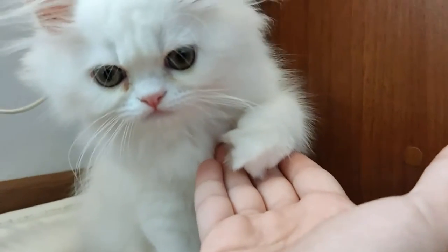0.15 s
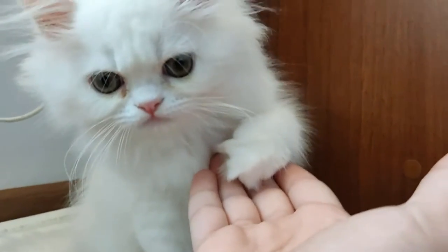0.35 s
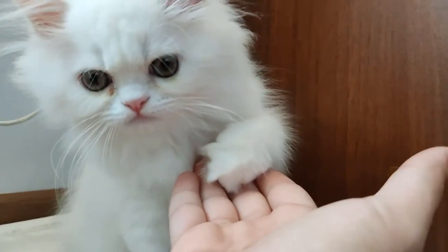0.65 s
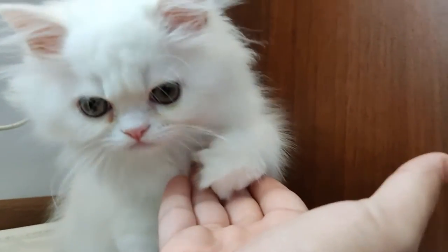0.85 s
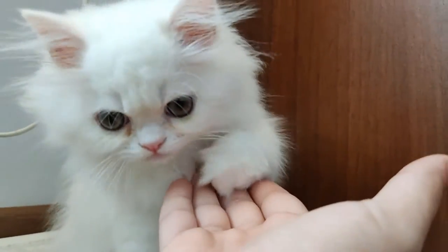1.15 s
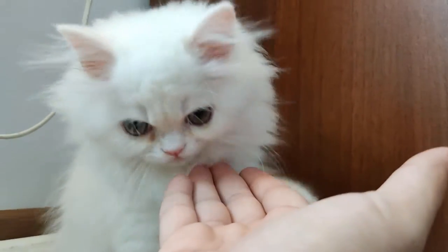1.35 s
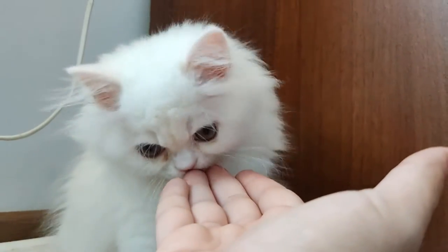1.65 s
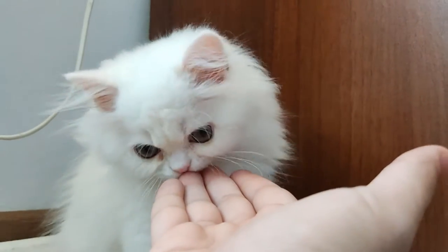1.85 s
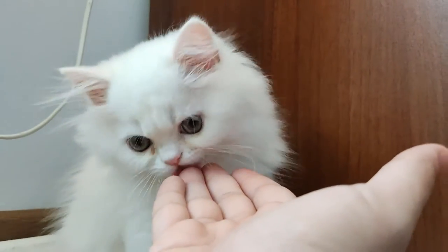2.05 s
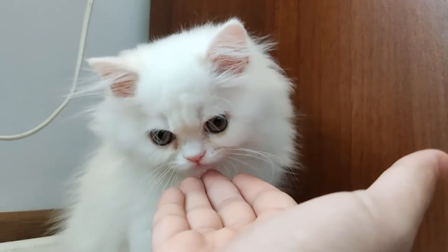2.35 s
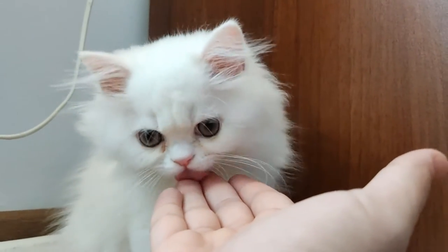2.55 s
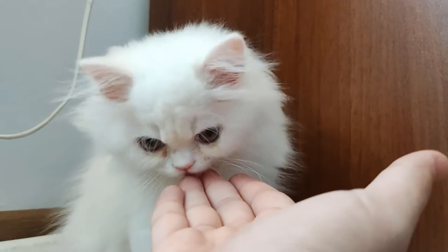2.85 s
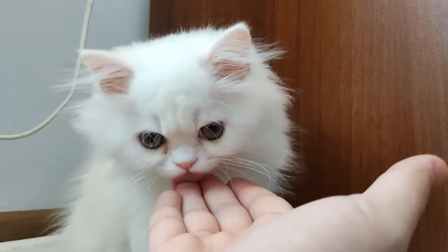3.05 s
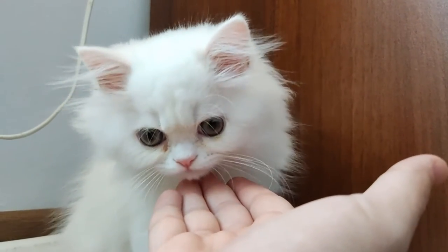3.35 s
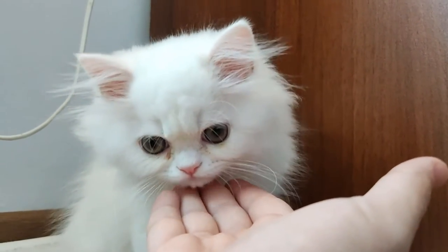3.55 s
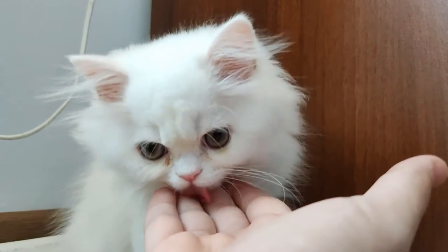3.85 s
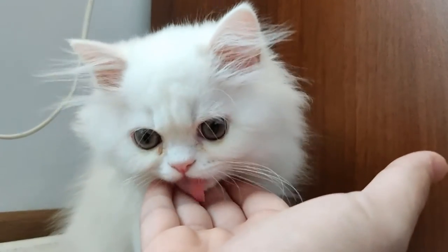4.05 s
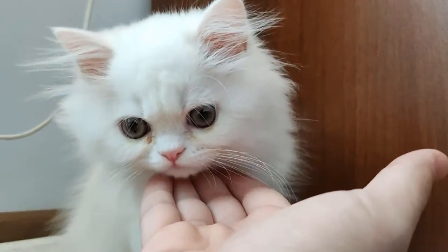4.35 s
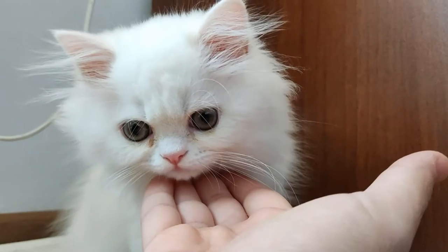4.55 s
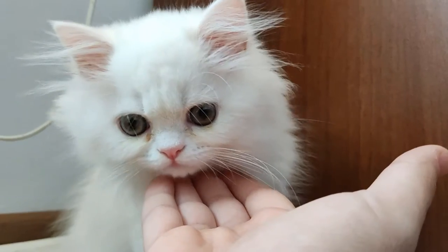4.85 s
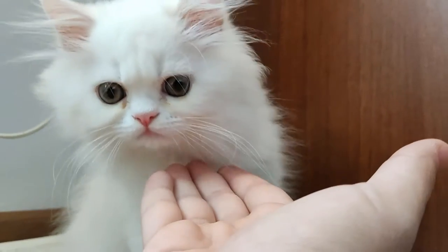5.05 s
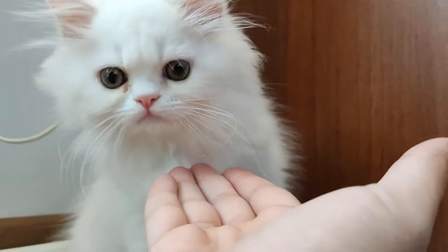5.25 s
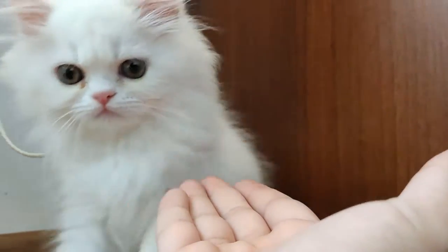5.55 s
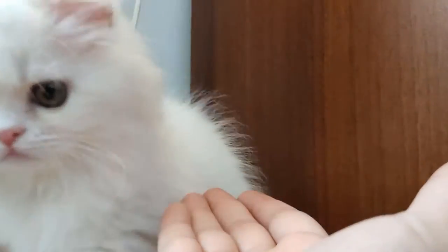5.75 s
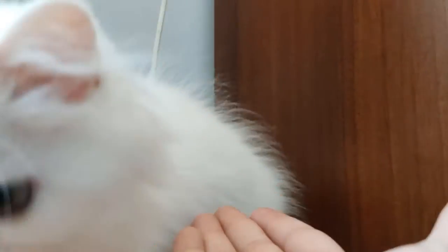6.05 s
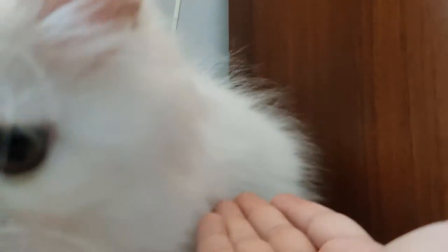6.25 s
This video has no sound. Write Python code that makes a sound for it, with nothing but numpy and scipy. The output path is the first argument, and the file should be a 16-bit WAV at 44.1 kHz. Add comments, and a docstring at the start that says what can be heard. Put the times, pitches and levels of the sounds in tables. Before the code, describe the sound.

Close, dry indoor sound on a hand-held phone with low rumble and faint hiss. First come rapid crackly finger taps, slips and dull thumps on the left side. Then the handling calms, leaving a kitten's delicate licking, sandpapery tongue strokes, little nose puffs and crisp wet clicks leaning right. Near the end, hollow knocks and clicks return, fading to light ticks and soft fur brushing.

```python
"""Grip rumble and a burst of finger taps and slips open the scene, loud on the left; then a kitten licks and sniffs.
Fingers: impulses and stick-slip grains reach the left port through the phone case, treble first.
Kitten: grainy rasp, wet smacks and fizz reach two ports through air; the right port boosts 7 to 8 kHz.
Short pitched ticks ring in the air; each port adds its own unrelated hiss and rumble."""
import sys
import numpy as np
from scipy import signal
from scipy.fft import rfft, irfft, next_fast_len
from scipy.io import wavfile
from scipy.ndimage import uniform_filter1d

SR = 44100
rng = np.random.default_rng(int(sys.argv[2]) if len(sys.argv) > 2 else 0)


def int16_out(signal):
    """Quantize to a 16-bit WAV file."""
    q = np.round(np.clip(np.atleast_2d(signal).T, -1, 1) * 32767)
    wavfile.write(sys.argv[1], SR, q.astype(np.int16))


N = 282240
FFT_SIZE = next_fast_len(N + 8192)
HZ = np.maximum(np.arange(FFT_SIZE // 2 + 1) * SR / FFT_SIZE, 1)


def undb(db):
    """Decibels to gain."""
    return 10 ** (np.asarray(db) / 20)


def curve(table):
    """Columns of a table joined by straight lines in time."""
    s, *columns = np.transpose(table)
    return [np.interp(np.arange(N) / SR, s, column) for column in columns]


def response(points):
    """Causal minimum-phase response through (hz, level_db) points, by folding the cepstrum."""
    hz, level_db = np.transpose(points)
    gain = undb(np.interp(np.log(HZ), np.log(hz), level_db))
    cepstrum = irfft(np.log(gain), FFT_SIZE)
    cepstrum[1:FFT_SIZE // 2] *= 2
    cepstrum[FFT_SIZE // 2 + 1:] = 0
    return np.exp(rfft(cepstrum))


def through(x, spectrum):
    """Filter a sound by a response."""
    return irfft(rfft(x, FFT_SIZE) * spectrum, FFT_SIZE)[:N]


def unit(spectrum, peak):
    """Scale a response so that a click peaks at 1, or so that white noise keeps its level."""
    impulse = irfft(spectrum, FFT_SIZE)
    if peak:
        return spectrum / np.abs(signal.hilbert(impulse)).max()
    return spectrum / np.sqrt(np.sum(impulse ** 2))


def clicks(s, db):
    """One impulse for each time."""
    x = np.zeros(N)
    np.add.at(x, (np.asarray(s) * SR).astype(int), undb(db))
    return x


def splinter(s, db, rough_db, ms):
    """A clean impulse plus a short decaying noise tail of rough contact."""
    tail = signal.lfilter([1], [1, -np.exp(-1000 / (ms * SR))], clicks(s, db + rough_db))
    return clicks(s, db) + tail * rng.standard_normal(N)


def grains(per_s, spread_db, smooth):
    """Random slips of uneven but bounded size over smooth noise; smooth is the noise share of power; level 1."""
    hit = rng.random(N) < per_s / SR
    size = np.minimum(rng.exponential(size=N), 3)
    sign = rng.choice([-1, 1], N)
    noise = rng.standard_normal(N)
    slips = hit * sign * undb(spread_db * size)
    share = np.clip(smooth, 0, 1)
    return np.sqrt(1 - share) * slips / np.sqrt(np.mean(slips ** 2)) + np.sqrt(share) * noise


def strokes(start_s, length_s, level_db, rise_db_s, fall_db_s):
    """Gain that rises to each start, holds for its length and falls away; the loudest stroke wins."""
    gain = np.zeros(N)
    for s, hold_s, db in zip(start_s, length_s, level_db):
        a, b = max(int((s - .2) * SR), 0), min(int((s + hold_s + .2) * SR), N)
        t = np.arange(a, b) / SR - s
        rise = rise_db_s * np.minimum(t, 0)
        fall = fall_db_s * np.maximum(t - hold_s, 0)
        gain[a:b] = np.maximum(gain[a:b], undb(db + rise - fall))
    return gain


def walk(rate_hz):
    """Random levels held 1 / rate_hz and slewed twice; spread near 1."""
    k = int(SR / rate_hz)
    steps = np.repeat(rng.standard_normal(N // k + 1), k)
    return 1.42 * uniform_filter1d(uniform_filter1d(steps, k), k)[:N]


def ring(x, hz, t60_s):
    """One decaying mode, as a complex one-pole resonator."""
    pole = np.exp(2j * np.pi * hz / SR - np.log(1000) / (t60_s * SR))
    return signal.lfilter([1], [1, -pole], x).imag


# port noise spectrum: hz, level_db
NOISE_SPECTRUM = [(5, 4), (20, 7), (60, -7.5), (200, -14), (600, -22.5), (1500, -31.5), (4000, -39.5),
                  (6000, -41.5), (8500, -40), (10000, -49), (12500, -47), (13200, -83)]
# port noise level before port colour: left_db, right_db
NOISE_DB = (-38.5, -45.5)


def room_tone():
    """Unrelated hiss and rumble in each port, each wavering a little in level."""
    colour = unit(response(NOISE_SPECTRUM), False)
    return np.array([through(rng.standard_normal(N) * undb(db + 1.0 * walk(10.0)), colour)
                     for db in NOISE_DB])


# grip load on the case: time_s, shake_db, sway_db
GRIP_LOAD = [(0.0, -42.5, -26), (0.14, -39, -29.5), (0.3, -47.5, -34.5), (0.45, -35.5, -23),
             (0.65, -35, -20.5), (0.86, -36.5, -25), (1.07, -32.5, -26.5), (1.35, -41, -33),
             (1.71, -47, -36.5), (2.23, -42, -33.5), (2.51, -45, -34.5), (3.39, -46, -36),
             (3.74, -49.5, -43), (4.21, -45, -37), (4.79, -45, -45), (5.13, -46.5, -41), (5.72, -39.5, -34),
             (6.06, -47.5, -38), (6.26, -42.5, -32.5), (6.4, -44.5, -38)]
# shake spectrum: hz, level_db
SHAKE_SPECTRUM = [(30, -11), (70, 1), (130, -4), (200, -2.5), (400, -12.5), (800, -26.5), (2000, -36),
                  (8000, -105)]
# sway spectrum: hz, level_db
SWAY_SPECTRUM = [(5, 9), (20, 4), (40, 0), (80, -13), (200, -60), (2000, -100)]


def grip():
    """Muscle tremor shakes the case and shifting load sways it: two low noises sharing one flutter."""
    shake_db, sway_db = curve(GRIP_LOAD)
    tremor_db = 3.0 * walk(12)
    shake = rng.standard_normal(N) * undb(shake_db + tremor_db)
    shake = through(shake, unit(response(SHAKE_SPECTRUM), False))
    sway = rng.standard_normal(N) * undb(sway_db + tremor_db)
    return shake + through(sway, unit(response(SWAY_SPECTRUM), False))


LATE_S, LATE_HZ, CASE_HZ = 0.001013, 6955, 152.6


def case_delay():
    """Bending waves: delay = LATE_S * (sqrt(LATE_HZ / (hz + CASE_HZ)) - 1), so treble leads."""
    return np.exp(-2j * np.pi * LATE_S * (2 * np.sqrt(LATE_HZ * (HZ + CASE_HZ)) - HZ))


def case_path(points, peak):
    """Spectrum of a case sound with the bending-wave delay as its phase: a downward chirp."""
    return unit(np.abs(response(points)) * case_delay(), peak)


# finger slips on the case: start_s, length_s, scratch_db, drag_db
FINGER_SLIPS = [(0.223, 0.027, -40.5, -55), (0.263, 0.016, -38.5, -63), (0.344, 0.0085, -37.5, -60),
                (0.374, 0.0083, -41, -62), (0.448, 0.0088, -36.5, -43), (0.543, 0.022, -53, -60),
                (0.577, 0.0049, -34.5, -35), (0.679, 0.025, -47, -49), (0.818, 0.13, -53, -55),
                (0.921, .05, -38, -43.5), (0.976, 0.028, -29.5, -26.5), (1.08, 0.052, -48, -41),
                (1.159, 0.017, -46.5, -39), (1.264, 0.03, -44, -40.5), (1.373, 0.014, -45.5, -46),
                (1.433, 0.02, -50, -44), (1.559, 0.011, -45.5, -27.5), (2.134, 0.067, -71, -46.5),
                (2.814, .008, -52, -50), (4.823, 0.022, -52.5, -42), (5.195, 0.0079, -55, -46),
                (5.335, 0.01, -44.5, -42), (5.359, 0.017, -44, -32), (5.516, 0.025, -59, -66),
                (5.667, .006, -55, -40.5), (5.733, 0.014, -61, -56), (5.855, 0.0076, -41, -34.5),
                (6.121, 0.011, -67, -41), (6.248, 0.018, -51, -57)]
# scratch spectrum: hz, level_db
SCRATCH_SPECTRUM = [(500, -42), (1200, 6.5), (2500, 5.5), (5000, 0.5), (8000, -3), (10000, -12),
                    (13000, -18), (15000, -36)]
# drag and knock spectrum: hz, level_db
KNOCK_SPECTRUM = [(120, -30), (250, 15.5), (500, 8), (800, 9), (1050, -1), (1400, -4), (2500, -51),
                  (5000, -103)]
SLIP_RISE_DB_S, SLIP_FALL_DB_S = 1500, 748
CREEP_SCRATCH_DB, CREEP_DRAG_DB = -24, -17  # steady skin creep, relative to the grip shake


def finger_slips():
    """Stick-slip of skin on the case: bright scratch and low drag, over creep that follows the grip load."""
    start_s, length_s, scratch_db, drag_db = np.transpose(FINGER_SLIPS)
    shake_db = curve(GRIP_LOAD)[0]
    scratch = strokes(start_s, length_s, scratch_db, SLIP_RISE_DB_S, SLIP_FALL_DB_S)
    scratch = scratch + undb(shake_db + CREEP_SCRATCH_DB)
    drag = strokes(start_s, length_s, drag_db, SLIP_RISE_DB_S, SLIP_FALL_DB_S)
    slips = grains(per_s=1400, spread_db=3.5, smooth=.3)
    nudges = grains(per_s=70, spread_db=4, smooth=.2)
    low = slips * drag + nudges * undb(shake_db + CREEP_DRAG_DB)
    return through(slips * scratch, case_path(SCRATCH_SPECTRUM, False)) + through(low, case_path(KNOCK_SPECTRUM, False))


# soft pad bumps on the case: time_s, pitch_hz, drive_db
PAD_BUMPS = [(0.164, 380, -23), (1.1098, 314, -10), (3.588, 435, -27), (5.7838, 350, -27)]
BUMP_T60_CYCLES = 7.5


def pad_bumps():
    """Each push, half a cycle long, rings one short mode."""
    out = np.zeros(N)
    for s, hz, db in PAD_BUMPS:
        push = np.hanning(int(SR / hz / 2))
        push = np.convolve(clicks([s], db), push / push.sum())[:N]
        out = out + ring(push, hz, BUMP_T60_CYCLES / hz)
    return out


# finger taps on the case: time_s, crack_db, grit_db, snap_db, knock_db, thump_db
FINGER_TAPS = [(0.1734, -36, -42, -43, -47, -37), (0.21, -43, -45, -52, -44, -53),
               (0.2154, -37, -39, -50, -43, -52), (0.2225, -28, -29, -41, -48, -42),
               (0.225, -28, -20.5, -40, -48, -29.5), (0.2292, -30, -29, -43, -50, -50),
               (0.2328, -30, -29, -34, -48, -37), (0.2356, -33, -24, -39, -48, -42),
               (0.24, -32, -25, -44, -41, -46), (0.2436, -35, -34, -39, -58, -48),
               (0.248, -20, -15, -22.5, -31, -32), (0.2571, -25, -27, -49, -47, -45),
               (0.271, -27, -41, -40, -53, -48), (0.2744, -17.5, -28, -36, -33, -32),
               (0.28, -35, -44, -46, -48, -36), (0.2952, -33, -37, -48, -54, -45),
               (0.339, -32, -31, -37, -37, -45), (0.3426, -17, -27, -46, -45, -40),
               (0.353, -20.5, -17, -28.5, -35, -46), (0.358, -20, -18.5, -37, -35, -45),
               (0.36, -27, -24, -40, -51, -51), (0.376, -34, -33, -45, -45, -46),
               (0.379, -28, -26, -37, -34, -37), (0.4024, -37, -33, -44, -50, -35),
               (0.428, -39, -32, -33, -43, -31), (0.439, -32, -40, -60, -45, -49),
               (0.4477, -21, -19, -25, -31, -46), (0.4544, -22, -16.5, -18.5, -40, -47),
               (0.4577, -23, -19, -28, -37, -43), (0.4599, -25, -21, -20, -35, -31),
               (0.4736, -34, -44, -60, -38, -48), (0.5439, -43, -32, -31, -48, -26),
               (0.5548, -40, -31, -27, -48, -33), (0.563, -49, -38, -38, -46, -43),
               (0.5678, -60, -38, -26, -37, -29), (0.5742, -38, -41, -32, -42, -45),
               (0.5783, -17.5, -20.5, -18.5, -23, -38), (0.588, -30, -36, -24, -32, -31),
               (0.6877, -45, -37, -25.5, -33, -38), (0.6911, -45, -43, -47, -41, -26),
               (0.6993, -38, -29.5, -27, -32, -36), (0.712, -55, -35, -35, -40, -45),
               (0.7866, -59, -57, -33.5, -37, -45), (0.8038, -37, -33, -38, -40, -43),
               (0.8224, -28.5, -17.5, -20.5, -26, -32), (0.8832, -38, -31.5, -30, -52, -30),
               (0.908, -40, -36, -42, -45, -43), (0.9205, -38, -32, -33, -43, -42),
               (0.926, -30, -38, -30, -33, -47), (0.9293, -32, -34, -26, -42, -45),
               (0.937, -39, -40, -42, -45, -45), (0.947, -32, -36, -34, -42, -45),
               (0.9521, -39, -40, -28, -32, -47), (0.955, -24, -23, -22, -27, -40),
               (0.959, -32, -32, -44, -56, -43), (0.9657, -32, -30, -26, -43, -48),
               (0.97, -32, -27, -25, -37, -34), (0.9775, -31, -28, -23, -35, -47),
               (0.9826, -34, -23, -34, -36, -33), (0.9855, -26, -21, -19, -28, -43),
               (0.989, -21, -23, -17, -24, -14.5), (0.9918, -14.5, -15, -9.5, -7, -9.5),
               (0.997, -29, -31, -20, -30, -36), (1.0028, -25, -24, -15, -8.5, -27),
               (1.0175, -46, -33, -20.5, -27, -20), (1.0277, -51, -60, -35, -27, -45),
               (1.0659, -56, -60, -36, -35, -34), (1.0826, -37, -43, -26, -24, -28),
               (1.0898, -33, -28.5, -38, -39, -33), (1.1082, -48, -43, -32, -17.5, -30),
               (1.1213, -37, -43, -22.5, -42, -24), (1.1298, -51, -53, -38, -38, -40),
               (1.1406, -49, -47, -35, -24, -43), (1.1686, -38, -43, -30, -32, -42),
               (1.172, -28, -41, -38, -40, -35), (1.1756, -29, -32, -28.5, -42, -37),
               (1.184, -32, -52, -48, -46, -43), (1.2276, -57, -56, -32.5, -43, -47),
               (1.2543, -33, -53, -59, -53, -43), (1.271, -32, -38, -26, -36, -38),
               (1.2727, -28, -34, -21, -22, -37), (1.2772, -25, -37, -46, -51, -22),
               (1.279, -25, -41, -45, -47, -45), (1.282, -30, -48, -51, -50, -45),
               (1.2903, -37, -42, -47, -31, -43), (1.2996, -33, -36, -33, -39, -29.5),
               (1.3585, -30, -45, -44, -43, -49), (1.3734, -27.5, -44, -56, -49, -43),
               (1.4302, -53, -59, -41, -34, -43), (1.4899, -31, -40, -34, -37, -30.5),
               (1.5631, -27, -47, -27, -35, -24), (1.5652, -23.5, -45, -26, -22, -20),
               (1.5756, -41, -47, -24, -17.5, -30), (2.1464, -60, -58, -58, -31, -41),
               (2.1506, -42, -60, -32, -27, -37), (2.1783, -57, -60, -57, -60, -37),
               (2.188, -60, -51, -34, -34, -50), (2.1959, -46, -55, -42, -38, -54),
               (2.2071, -52, -50, -38, -35, -51), (2.2117, -53, -45, -35, -35, -50),
               (2.5962, -60, -59, -40, -30.5, -38), (2.7219, -51, -51, -32, -25.5, -33.5),
               (2.822, -51, -44, -25, -19, -31), (3.5564, -59, -60, -60, -44, -47),
               (3.8378, -55, -45, -35, -33, -48), (3.87, -54, -53, -33, -31, -32),
               (3.9965, -60, -60, -42, -38, -51), (4.0812, -54, -48, -38, -31, -49),
               (4.105, -60, -58, -46, -35, -48), (4.2217, -58, -53, -37.5, -32.5, -41),
               (4.379, -60, -60, -60, -34.5, -38), (4.448, -58, -50, -34, -28, -47),
               (4.5584, -60, -60, -48, -33, -45), (4.8164, -56, -51, -38, -34, -47),
               (4.8195, -55, -53, -30, -29, -35), (4.8293, -44, -47, -22, -22, -25.5),
               (4.8328, -40, -49, -21, -12.5, -35), (4.841, -55, -42, -38, -44, -48),
               (4.8483, -29, -51, -60, -43, -32), (4.863, -23, -41, -36, -43, -46),
               (4.9545, -33.5, -45, -39, -39, -39), (5.1062, -60, -60, -49, -41, -34),
               (5.1145, -56, -50, -35, -21.5, -44), (5.1812, -28, -41, -46, -51, -31),
               (5.186, -27, -32, -47, -37, -29), (5.1932, -28, -33, -38, -45, -47),
               (5.1946, -19.5, -19.5, -14, -3.5, -13.5), (5.2061, -30, -47, -34, -35, -28),
               (5.277, -54, -60, -52, -27, -40), (5.322, -55, -44, -21.5, -18.5, -35),
               (5.332, -28, -43, -60, -54, -33), (5.3381, -25, -34, -38, -30, -21.5),
               (5.3415, -27, -22, -23, -26, -18), (5.3446, -33, -25, -16, -3.5, -23),
               (5.356, -40, -42, -38, -31, -45), (5.362, -42, -27, -14.5, -20, -18),
               (5.3688, -25, -39, -35, -37, -45), (5.372, -16, -41, -22, -18, -22),
               (5.3762, -32, -42, -34, -46, -43), (5.3803, -34, -43, -26, -32, -31),
               (5.513, -38, -37, -43, -25, -36), (5.5207, -34, -34, -26, -9.5, -26),
               (5.544, -52, -38, -29, -18, -34), (5.672, -29, -41, -47, -57, -30),
               (5.6784, -25.5, -43, -32.5, -22, -50), (5.7271, -29, -32, -19.5, -12.5, -27),
               (5.7324, -25, -30.5, -21.5, -11, -23), (5.7612, -60, -56, -51, -29, -33),
               (5.8357, -17.5, -26, -29, -6, -15), (5.8378, -13.5, -22, -16.5, -1.5, -18.5),
               (5.8445, -42, -43, -25, -47, -11), (5.8585, -24, -43, -40, -27, -43),
               (5.8627, -20, -46, -25, -26, -44), (5.8717, -36, -49, -39, -33, -49),
               (6.1595, -32, -48, -38, -41, -48), (6.2337, -27, -44, -42, -46, -52),
               (6.2578, -34, -47, -31.5, -57, -48), (6.269, -39, -59, -44, -60, -35),
               (6.2794, -39, -52, -38, -31, -43), (6.3504, -38, -38, -54, -41, -32)]
# crack spectrum: hz, level_db
CRACK_SPECTRUM = [(3500, -35), (4200, -7), (5000, -3.5), (5800, 4), (8000, 1.5), (10500, -15),
                  (13000, -20.5), (15000, -40)]
# grit spectrum: hz, level_db
GRIT_SPECTRUM = [(1700, -25), (2000, -3), (2400, -1.5), (2900, -2), (4200, -4), (5000, -4.5), (5800, -27),
                 (7000, -54)]
# snap spectrum: hz, level_db
SNAP_SPECTRUM = [(700, -1), (800, -5), (1000, 7.5), (1300, 2), (2000, -4.5), (2400, -15), (2900, -18),
                 (3500, -61)]
KNOCK_S, EDGE_S, EDGE_DB = 0.00098, 0.00196, 8.5  # first arrival; louder return from the far edge
THUMP_HZ, THUMP_T60_S = 176.6, 0.068


def finger_taps():
    """Impacts in the case: chirped crack, grit and snap, a double knock, and one ringing thump mode."""
    s, crack_db, grit_db, snap_db, knock_db, thump_db = np.transpose(FINGER_TAPS)
    crack = through(splinter(s, crack_db, rough_db=-13, ms=0.93), case_path(CRACK_SPECTRUM, True))
    grit = through(splinter(s, grit_db, rough_db=-19.5, ms=1.2), case_path(GRIT_SPECTRUM, True))
    snap = through(splinter(s, snap_db, rough_db=-29, ms=2.5), case_path(SNAP_SPECTRUM, True))
    first = np.exp(-2j * np.pi * HZ * KNOCK_S)
    edge = undb(EDGE_DB) * np.exp(-2j * np.pi * HZ * EDGE_S)
    double = unit(np.abs(response(KNOCK_SPECTRUM)) * first * (1 + edge), True)
    knock = through(splinter(s, knock_db, rough_db=-25, ms=2.6), double)
    thump = through(ring(clicks(s, thump_db), THUMP_HZ, THUMP_T60_S), case_delay())
    return crack + grit + snap + knock + thump


# pitched ticks in the air, before port colour: time_s, pitch_hz, level_db, t60_s, left_minus_right_db
TICKS = [(1.393, 1830, -19, 0.01, 12), (6.1592, 4770, -50, 0.018, 8), (6.257, 6040, -36, 0.021, 12),
         (6.266, 6150, -34, 0.027, 16)]
POP_RISE_CYCLES = 1.5


def pops():
    """Each tick swells over a cycle or two and rings briefly at one pitch."""
    out = 0
    for s, hz, db, t60_s, pan_db in TICKS:
        t = np.maximum(np.arange(N) / SR - s, 0)
        swell = np.minimum(t * hz / POP_RISE_CYCLES, 1) * undb(db - 60 * t / t60_s)
        out = out + swell * np.sin(2 * np.pi * hz * t) * undb([[0], [-pan_db]])
    return out


# tongue strokes, nose puffs and fur brushes: start_s, length_s, right_port_db
RASP_STROKES = [(0.276, 0.0092, -63), (1.259, 0.011, -46.5), (1.38, 0.0091, -51), (1.502, 0.066, -53),
                (1.733, 0.046, -55.5), (1.846, 0.032, -50.5), (2.012, 0.079, -52), (2.167, 0.13, -51),
                (2.215, 0.086, -46), (2.423, .01, -55), (2.483, 0.069, -51), (2.586, 0.077, -57.5),
                (2.729, 0.046, -40), (2.94, 0.092, -50), (3.103, 0.051, -44), (3.228, 0.02, -40),
                (3.27, 0.016, -57), (3.326, .01, -60), (3.847, 0.092, -46), (3.95, 0.046, -55),
                (4.078, 0.1, -48), (4.238, .015, -56.5), (5.252, 0.17, -54), (5.567, 0.015, -58),
                (5.688, 0.0067, -55), (5.86, 0.13, -56), (6.049, 0.066, -53.5), (6.215, 0.13, -56.5)]
# wet mouth clicks: time_s, right_port_db, low_part_db (before port colour)
MOUTH_SMACKS = [(1.522, -33, -45), (1.554, -40, -60), (1.741, -37, -60), (1.766, -38, -60),
                (1.842, -39, -60), (1.8506, -34, -60), (1.8602, -36, -59), (2.0012, -27, -51),
                (2.0328, -28, -58), (2.0506, -34, -49), (2.086, -40, -51), (2.2004, -36, -60),
                (2.2268, -31, -64), (2.243, -32, -62), (2.258, -28, -64), (2.277, -33, -57),
                (2.284, -33, -58), (2.299, -29.5, -55), (2.4632, -30, -44), (2.49, -24.5, -41.5),
                (2.519, -32.5, -60), (2.73, -36, -47), (2.7756, -39, -57), (2.7998, -33, -54),
                (2.9, -40, -60), (2.933, -43, -56), (2.943, -32, -49), (2.9516, -39, -60),
                (2.973, -36, -60), (2.979, -28, -45), (3.0056, -30.5, -53), (3.0213, -42, -60),
                (3.11, -36, -60), (3.136, -33, -59), (3.149, -36, -62), (3.2836, -53, -39),
                (3.326, -33, -54), (3.8343, -20.5, -41), (3.844, -37, -53), (3.857, -42, -46),
                (3.887, -31, -52), (3.893, -37, -60), (3.9017, -26, -50), (3.947, -34, -56),
                (3.965, -32, -57), (4.0965, -38, -56), (4.16, -36, -60), (4.198, -55, -45),
                (4.245, -35, -61), (5.688, -31, -55), (6.236, -25.5, -48), (6.27, -39, -50)]
# rasp spectrum: hz, level_db
RASP_SPECTRUM = [(800, -32), (1500, -11.5), (2500, -3), (3500, -7), (6000, -2), (8500, 6), (10000, -16.5),
                 (15000, -28)]
# smack spectrum: hz, level_db
SMACK_SPECTRUM = [(2000, -34), (4500, -9), (6500, -4.5), (8000, 10.5), (9500, -9), (12000, -25),
                  (15000, -26)]
# low part of the smacks, spectrum: hz, level_db
SMACK_LOW_SPECTRUM = [(700, -35), (1500, -0.5), (3000, 12), (4500, -18), (7000, -46)]
# fizz spectrum: hz, level_db
FIZZ_SPECTRUM = [(7000, -35), (9500, 1), (11500, -1), (14000, -3), (15500, -4.5)]
# right port response: hz, gain_db
RIGHT_PORT_GAIN = [(100, 3.85), (5500, 6.7), (6600, 9.5), (7200, 11.8), (7750, 12.4), (8300, 5.3),
                   (9000, 7.5), (10000, 9.2), (15000, 2.5)]
STROKE_RISE_DB_S, STROKE_FALL_DB_S = 452, 307
FIZZ_FROM_DB, FIZZ_GROWTH = -2, 0.52  # fizz gain equals rasp gain at this level; excess grows by this power
SCATTER_DB, FAR_PORT_DB, PORT_LAG_SAMPLES = 3.5, -9, 8


def kitten():
    """Rasp, smacks and fizz near the right port; the left hears them late, weaker, plus hand and fur scatter."""
    rasp = strokes(*np.transpose(RASP_STROKES), STROKE_RISE_DB_S, STROKE_FALL_DB_S)
    rasp = rasp * undb(2.13 * walk(150))
    fizz = rasp * (rasp / undb(FIZZ_FROM_DB)) ** FIZZ_GROWTH  # harder strokes fizz more
    s, smack_db, low_db = np.transpose(MOUTH_SMACKS)
    # levels are set as heard at the right port, so its response is divided out again
    right = response(RIGHT_PORT_GAIN)
    mouth = unit(response(RASP_SPECTRUM) * right, False) / right
    smack = unit(response(SMACK_SPECTRUM) * right, True) / right
    smack_low = unit(response(SMACK_LOW_SPECTRUM), True)
    direct = through(grains(per_s=2200, spread_db=2.0, smooth=0.56) * rasp, mouth)
    direct = direct + through(splinter(s, smack_db, rough_db=-13, ms=1.2), smack)
    direct = direct + through(splinter(s, low_db, rough_db=-14, ms=1.5), smack_low)
    fizz_noise = grains(per_s=4300, spread_db=-1.0, smooth=1.0) * fizz
    direct = direct + through(fizz_noise, unit(response(FIZZ_SPECTRUM), False))
    scattered = grains(per_s=1500, spread_db=5, smooth=0.62) * rasp * undb(SCATTER_DB)
    left = np.roll(direct, PORT_LAG_SAMPLES) * undb(FAR_PORT_DB) + through(scattered, mouth)
    return np.array([left, direct])


# left port response: hz, gain_db
LEFT_PORT_GAIN = [(100, -13), (3000, 9), (6000, 2.5), (8000, -11.5), (10000, 7), (15000, 5)]


def scene():
    """Each port colours its air sound and noise, except the left noise; case sounds stay on the left."""
    air = kitten() + pops()
    noise = room_tone()
    left = through(air[0], response(LEFT_PORT_GAIN)) + noise[0]
    right = through(air[1] + noise[1], response(RIGHT_PORT_GAIN))
    case = finger_taps() + pad_bumps() + finger_slips() + grip()
    return np.array([left + case, right])


TOP_HZ = 15550


def record(dry):
    """The phone cuts the top with a steep elliptic low-pass."""
    return signal.sosfilt(signal.ellip(12, .2, 80, TOP_HZ, fs=SR, output="sos"), dry)


dry = scene()
out = record(dry)
int16_out(out)
```